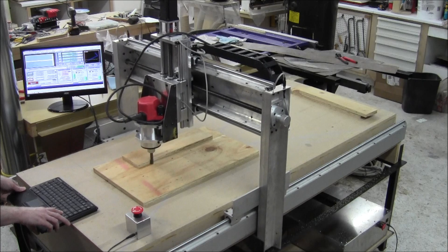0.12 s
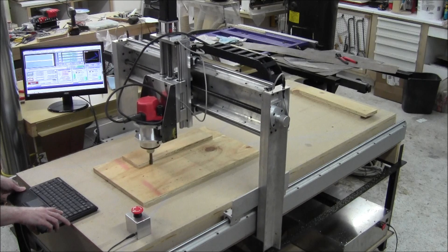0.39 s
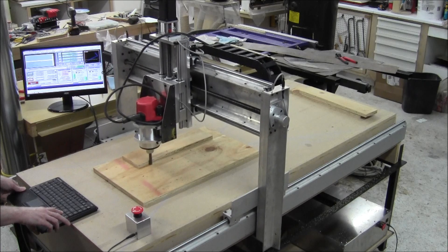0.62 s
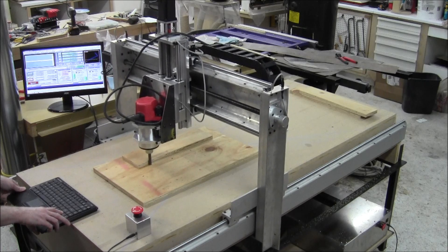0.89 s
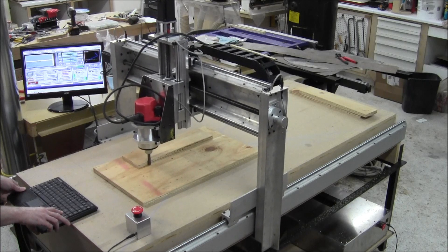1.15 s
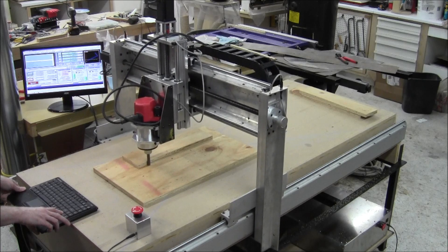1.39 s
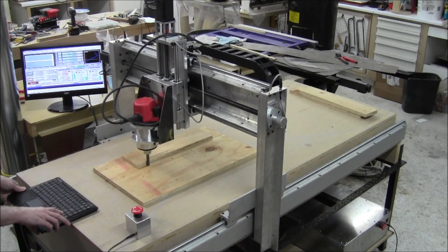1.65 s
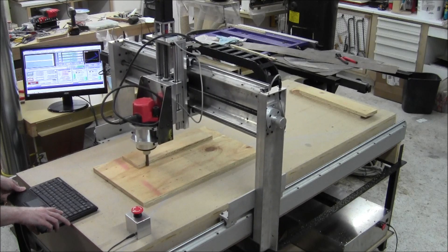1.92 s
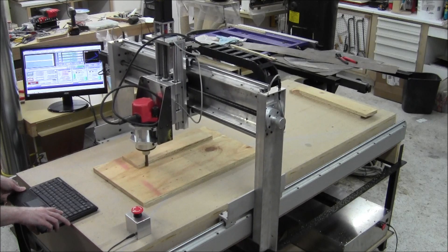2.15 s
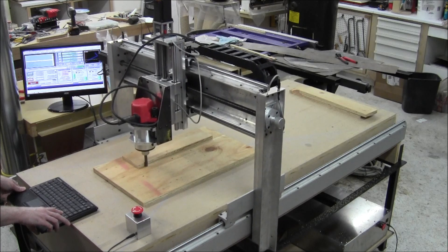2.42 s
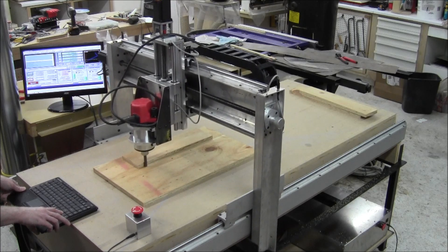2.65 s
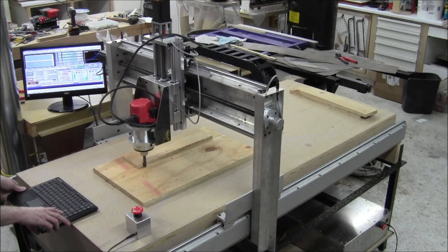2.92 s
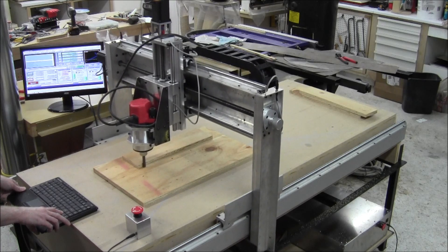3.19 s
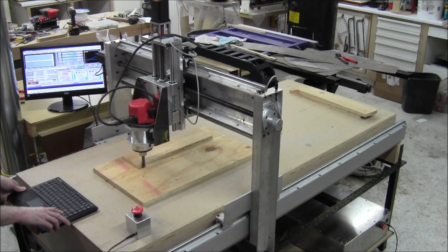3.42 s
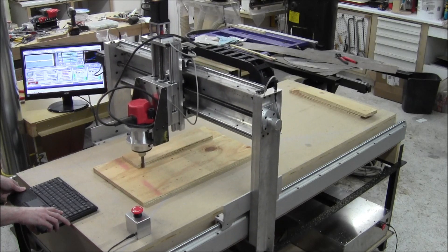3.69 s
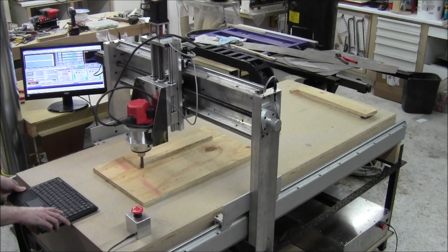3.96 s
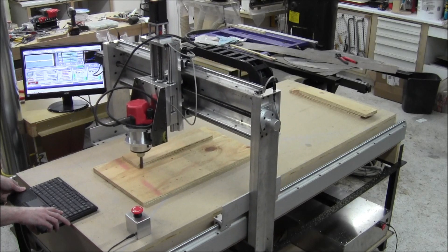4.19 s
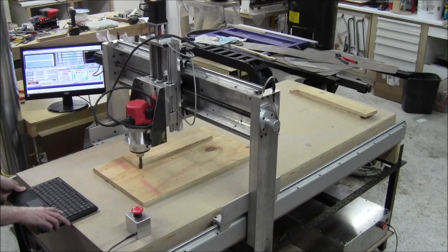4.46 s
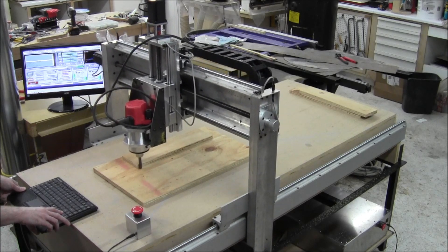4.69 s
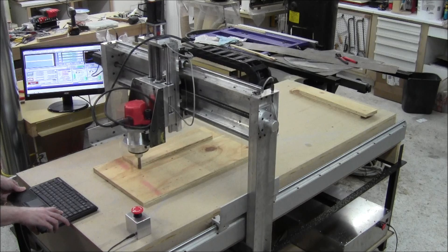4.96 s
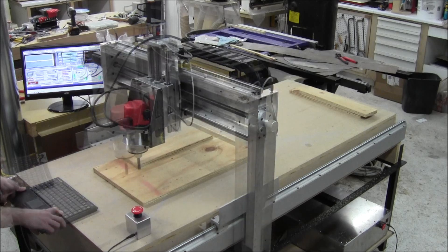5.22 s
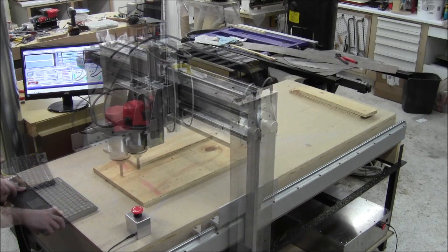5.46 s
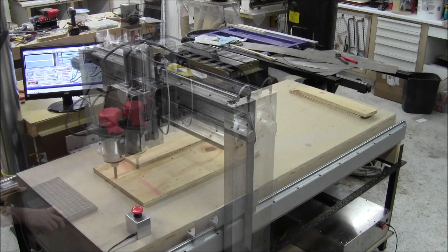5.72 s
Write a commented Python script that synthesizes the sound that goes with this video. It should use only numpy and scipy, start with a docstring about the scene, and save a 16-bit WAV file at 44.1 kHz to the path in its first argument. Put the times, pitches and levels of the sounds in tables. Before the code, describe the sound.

In a workshop, a router spindle on a gantry runs at full speed, cutting a groove in a board. A steady buzzing whine of stacked pitches sits within dense fan roar and chip hiss. Nothing starts or stops; tones only waver slightly. After about four and a half seconds it all fades, the whine edging up in pitch at the very end. Stereo microphones a few steps away, faint room echo.

```python
"""A workshop: a wood router on a gantry cuts a groove along a board at full speed, fading down at the end.
The spindle whines as sines on multiples of its turning rate. The cooling fan and the chips roar as
coloured noise, with a mono feed to the shop's echo. Near the end the whine rises slightly in pitch, its
weak multiples fade and its strong ones change in level. Low hum tones lie underneath, the lowest one
throbbing; they sink by the end."""
import sys
import numpy as np
from scipy import signal
from scipy.fft import rfft, irfft, next_fast_len
from scipy.io import wavfile
from scipy.ndimage import map_coordinates

SR = 44100
rng = np.random.default_rng(int(sys.argv[2]) if len(sys.argv) > 2 else 0)


def bounce(signal):
    """Save signal as a 16-bit WAV file at the path given by the first command-line argument."""
    frames = np.transpose(np.atleast_2d(signal))
    limited = np.clip(frames, -1, 1)
    pcm = np.round(limited * 32767).astype(np.int16)
    wavfile.write(sys.argv[1], SR, pcm)


def volts(x):
    """Linear amplitude factor 10**(x/20) for a level x in dB, scalar or array-like."""
    e = np.asarray(x, float) / 20
    return 10 ** e


N = 257970
TIME = np.arange(N) / SR

# Strong spindle orders, multiples of the turning rate: order
STRONG_ORDERS = [1, 2, 3, 4, 5, 6, 7, 8, 23]
# Amplitude share of the weak orders, dropping near the end: time_s, share_0_to_1
WEAK_SHARE = [(0, 1), (5.52, 0.99), (5.63, 0.2), (5.85, .08)]
# Spots along the board where an order swells or sinks, one list per strong order, then per weak order:
# centre_s, half_length_s, change_db
ORDER_SPOTS = [
    [(4.1, 0.43, 0.6)],
    [(.3, 0.85, -2.5), (1.2, 0.89, 2.5), (2.8, 0.32, 3.5), (3.7, 0.32, 1.5)],
    [(.78, 0.1, 5), (.99, .07, -5), (1.22, 0.14, 4.5), (1.9, 0.14, 2.5), (2.5, 0.2, 5), (3, 0.16, 5.5),
     (3.4, 0.15, 6), (5.3, 0.2, -12), (5.6, .08, 3.5)],
    [(2.9, .4, 3)],
    [(2.4, 0.41, 2), (3.5, 0.2, -2.1), (5.3, 0.75, -15)],
    [(.85, .11, -6), (1.6, .12, 10), (2.2, .3, 6.5), (3, .3, -4)],
    [(.2, 0.53, 5.5), (1.25, 0.12, -4), (2.3, 0.17, -10), (2.75, .15, 4.5), (3.9, 0.33, 4), (4.8, .2, -1.5)],
    [(.3, 1, 9.5), (1.97, 0.23, -15), (2.8, .09, 6), (3.3, .25, -4), (5.1, 0.71, 5.5)],
    [(.2, 0.32, -4.5), (.98, 0.23, 2.5), (2.3, .15, -1), (2.9, 0.27, 3), (3.6, .3, 0.5), (4.8, 0.53, -1)],
    [(.3, .3, 9), (3.4, 1, 8.5), (5.2, .4, 7)],
    [(1.5, .9, 5.5), (4.9, .9, 10)],
    [(1.2, .6, 4), (3.2, .4, 2), (4.8, .7, 6)],
    [(1.5, 1.2, 5.5), (5.5, .2, 7)],
    [(3.6, 2, 8.5)],
    [(.7, .4, 3.5), (2.4, .7, 6.5)],
    [(.4, .5, 4), (3.4, 1.1, 6)],
    [(2.8, 1.5, 3)],
    [(1.5, .3, 4), (4.4, .6, 6)],
    [(.4, .6, 9)],
    [(.3, .3, 4), (2.4, .6, 3)],
    [(.6, .12, 7), (2.8, .3, 7), (5, .09, 15)],
    [(.2, 0.71, 8), (4, .4, 8)],
    [(.4, .4, 8), (1.8, .4, 9.5)],
    [(2, .9, 6), (4, .9, 6)],
    [(3.8, 1.1, 16)],
    [(4, .8, 11)],
    [(2.9, 1.1, 9)],
    [(2.3, .6, 7)],
    [(3, 1.6, 9.5)],
    [(2.1, .6, 9.5), (4.4, .4, 7)],
    [(1.8, .6, 7), (3.5, .8, 12)],
    [(2.6, 0.91, 16)],
]


def unit(x):
    """Scaled to rms 1."""
    return x / np.sqrt(np.mean(x ** 2) + 1e-20)


def along(points, hz):
    """(Hz, value) points interpolated on a log frequency axis."""
    f, v = np.transpose(points)
    return np.interp(np.log(hz + 1), np.log(f + 1), v)


def curves(rows):
    """One value per sample for each column after the time."""
    s, *cols = np.transpose(rows)
    return [np.interp(TIME, s, c) for c in cols]


def wobble(knots_per_s):
    """A smooth random curve through normally distributed knots."""
    knots = rng.standard_normal(400)
    coarse_s = TIME[::64]
    smooth = map_coordinates(knots, [coarse_s * knots_per_s])
    return np.interp(TIME, coarse_s, smooth)


def spot(centre_s, half_length_s, change_db):
    """A bell-shaped swell or dip in dB."""
    return change_db * np.exp(-((TIME - centre_s) / half_length_s) ** 2)


def spots_db(rows):
    """Sum of the swells and dips in rows."""
    return sum(spot(*row) for row in rows)


def filtered(x, response):
    """x through a zero-phase response of frequency."""
    m = next_fast_len(N + SR // 2)
    return irfft(rfft(x, m) * response(np.fft.rfftfreq(m, 1 / SR)), m)[..., :N]


def tone(phase, level_db, side_db, drift_rad=0):
    """A sine whose path to the two microphones differs a little, mostly in arrival time, and drifts."""
    # the sound path shifts as the gantry moves
    phase = phase + rng.uniform(0, 2 * np.pi) + drift_rad * wobble(2.0)
    mid, quadrature = np.sin(phase), np.cos(phase)
    in_phase_part = 0.3 * wobble(2.5) * mid
    delayed_part = (0.9 + 0.3 * wobble(2.5)) * quadrature
    side = volts(side_db) * (in_phase_part + delayed_part)
    return np.sqrt(2) * volts(level_db) * np.array([mid + side, mid - side])


def shaft():
    """Spindle angle in radians: the speed curve plus random hunting, integrated."""
    # creeps up, then rises faster near the end: time_s, speed_rpm
    speed_points = [(0, 24047), (1, 24053), (4.8, 24052), (5, 24068), (5.42, 24075), (5.7, 24186),
                    (5.85, 24201)]
    hunt_rpm = 7
    rpm = curves(speed_points)[0] + hunt_rpm * wobble(3.3)
    return 2 * np.pi * np.cumsum(rpm / 60) / SR


def strong_levels():
    """Strong orders drift with travel, swell or sink at their spots and change as the weak orders fade."""
    # each strong order: start_rms_db (before spots), drift_db_per_s, late_change_db, wander_db
    travel = [(-44.5, 0.76, -1, 0.5), (-36, -1.13, -2.5, 0.5), (-48, 0.3, 6.5, 1.4), (-49, 1.27, -14, 1.1),
              (-41.5, -0.4, 3, 0.8), (-57, 1.57, -8, 1.4), (-46.5, -0.2, -9, 1.8), (-53.5, 0.2, -11, 0.3),
              (-47, -.1, 3.5, .6)]
    # brief common dip of the strong orders above the first: centre_s, half_length_s, change_db
    common_dip = (3.19, 0.096, -2)
    late_share = 1 - curves(WEAK_SHARE)[0]
    levels = []
    for order, row, spots in zip(STRONG_ORDERS, travel, ORDER_SPOTS):
        start_db, drift_db_per_s, late_db, wander_db = row
        level_db = start_db + drift_db_per_s * TIME + late_db * late_share + spots_db(spots)
        if order > 1:
            level_db = level_db + spot(*common_dip)
        levels.append(level_db + wander_db * wobble(5.17))
    return levels


def whine(angle):
    """Unbalance, flutes and commutator each beat a whole number of times per turn."""
    # side share of each strong order, its difference between the microphones: side_db
    strong_side = [-21.5, -17, -19, -24, -17, -14, -11, -14, -17]
    # weak orders, fading near the end: order
    weak_orders = [9, 10, 11, 12, 13, 14, 15, 16, 17, 18, 19, 20, 21, 22, 24, 25, 26, 27, 28, 29, 30, 31,
                   32]
    # each weak order: rms_db (before spots and the late fade), side_db
    weak_levels = [(-59, -15), (-57, -15), (-60, -11), (-59, -10), (-60, -21), (-58, -18), (-63, -12),
                   (-64, -10.5), (-58, -7), (-59, -10.5), (-61, -12), (-71, -12), (-67, -19), (-66, -12),
                   (-66, -13), (-67.5, -15), (-73, -8), (-75, -9), (-75, -2.5), (-78, -6), (-79, -.4),
                   (-79, -2.5), (-81, -.4)]

    def flutter_db(order):
        return 0.14 * np.sqrt(order) * wobble(14)

    strong = 0
    for order, level_db, side_db in zip(STRONG_ORDERS, strong_levels(), strong_side):
        level_db = level_db + flutter_db(order)
        strong = strong + tone(order * angle, level_db, side_db, drift_rad=0.28 * np.sqrt(order))

    weak = 0
    weak_spots = ORDER_SPOTS[len(STRONG_ORDERS):]
    for order, (rms_db, side_db), spots in zip(weak_orders, weak_levels, weak_spots):
        level_db = rms_db + spots_db(spots) + 0.85 * wobble(3.2) + flutter_db(order)
        weak = weak + tone(order * angle, level_db, side_db, drift_rad=1.0)
    return strong + curves(WEAK_SHARE)[0] * weak


def rush(gain, gate):
    """Stereo noise of rms 1, gated and then coloured; mid and side shares set the left-right likeness."""
    # left-right likeness of the roar: freq_hz, correlation_0_to_1
    likeness = [(30, .87), (100, 1), (200, 1), (400, 0.98), (700, 1), (1300, 0.97), (1900, 0.89),
                (2500, 0.91), (5000, 0.87), (9000, 0.85), (11000, 0.84), (13000, 0)]

    def response(hz):
        turn = np.arccos(np.clip(along(likeness, hz), 0, 1)) / 2
        return gain(hz) * [np.cos(turn), np.sin(turn)]

    mid, side = filtered(gate * rng.standard_normal((2, N)), response)
    return unit(np.array([mid + side, mid - side]))


def roar(angle):
    """Fan air rings in the housing; the hiss puffs with each flute; both rise at the end against the fade."""
    # air column of the motor housing: centre_hz, width_hz, relative_db
    housing_modes = [(451, 15.5, -10), (688, 98, -7), (777, 45, -3), (577, 36, -9.5), (906, 34, -2),
                     (1004, 106, 0.5), (1055, 49, -3), (1115, 82, 1), (1328, 94, -2.5), (1464, 45, -16)]
    # fan and chip hiss, spectral density: freq_hz, relative_db
    hiss_spectrum = [(30, -40), (60, -26), (150, -30.5), (300, -19.5), (420, -6.5), (1500, -2),
                     (2000, -3.5), (2700, -2), (3600, 0), (4300, -3), (5000, -6.5), (5700, -5),
                     (8000, -5.5), (10000, -7), (11500, -17), (13000, -20.5), (13700, -22), (14500, -34)]
    # peaks and dips lent by frame, gantry and table: centre_hz, width_hz, change_db
    frame_modes = [(480, 20, 3), (590, 25, -4), (775, 20, -5), (860, 20, -3), (1070, 25, -5),
                   (1225, 40, -4), (1390, 30, -3), (1550, 80, 2), (1760, 120, 2), (1850, 50, -3),
                   (2300, 70, 3), (2660, 110, 3), (2920, 80, -1.5), (3870, 80, -3.5), (4250, 100, 2),
                   (4720, 90, 3.5), (5100, 60, 4), (5240, 90, -3), (5520, 80, 4.5), (6800, 120, -2),
                   (7130, 100, 2), (7410, 70, 3.5), (7580, 80, 1.5), (8400, 100, -1.5), (9100, 150, 2),
                   (9600, 150, 1.5)]
    # slight swells and dips of the roar, rising at the end against the fade: time_s, change_db
    surge_points = [(0, -0.15), (2.4, -0.16), (2.8, 0.6), (3.1, 0.1), (3.8, 0.6), (4.3, 0.06), (5.4, 0.1),
                    (5.85, 1.5)]
    housing_start_db, housing_drift_db_per_s, hiss_base_db = -40, -0.22, -34.5  # before surge and fade

    def frame_gain(hz):
        return volts(sum(db / (1 + (2 * (hz - c) / w) ** 2) for c, w, db in frame_modes))

    def housing_gain(hz):
        power = sum(volts(db) ** 2 / (1 + (2 * (hz - c) / w) ** 4) for c, w, db in housing_modes)
        return np.sqrt(power) * frame_gain(hz)

    def hiss_gain(hz):
        return volts(along(hiss_spectrum, hz)) * frame_gain(hz)

    surge_db = curves(surge_points)[0]
    swell = wobble(3.37)  # shared by housing and hiss
    housing_db = housing_start_db + housing_drift_db_per_s * TIME + surge_db
    housing_db = housing_db + 0.29 * swell + 0.67 * wobble(8)
    housing = volts(housing_db) * rush(housing_gain, 1)

    puffs = 1 + 0.02 * np.cos(angle) + 0.09 * np.cos(2 * angle)  # once and twice per turn
    hiss_db = hiss_base_db + surge_db + 0.41 * swell + 0.091 * wobble(10.0)
    hiss = volts(hiss_db) * rush(hiss_gain, puffs)
    return housing + hiss


def shop(x):
    """Walls and benches answer: a noise tail in which each frequency dies at its own speed."""
    # workshop echo: freq_hz, t60_s
    decay_times = [(200, .5), (2000, .4), (10000, .2)]
    hz, t, spectrum = signal.stft(rng.standard_normal((2, SR // 2)), SR, nperseg=256)
    decay = volts(-60 * t / along(decay_times, hz)[:, None])
    tail = signal.istft(spectrum * decay, SR, nperseg=256)[1]
    return signal.fftconvolve(x, tail / np.linalg.norm(tail[0]), axes=1)[:, :N]


def throb():
    """Level of the lowest hum in dB: it sinks steadily and dips twice each period."""
    # spots where it swells or sinks: centre_s, half_length_s, change_db
    hum_spots = [(1.3, .25, 2.5), (3.18, .05, -6), (3.84, .12, 4.5)]
    start_db, drift_db_per_s = -58, -1.03  # before dips and spots
    period_s, offset_s, dip_half_width = 0.503, 0.39, 0.16  # half-width as a share of the period
    main_dip_db, second_dip_db_per_s = -6.5, -0.9  # the second dip deepens with time

    def dip(lead):
        cycle = ((TIME - offset_s) / period_s + lead) % 1
        return np.exp(-((cycle - 0.5) / dip_half_width) ** 2)

    dips_db = main_dip_db * dip(0.41) + second_dip_db_per_s * TIME * dip(0)
    return start_db + drift_db_per_s * TIME + dips_db + spots_db(hum_spots) + 0.7 * wobble(6)


def hum():
    """Low tones of steady pitch whose levels waver, nearly the same at both microphones."""
    # upper hum tones: pitch_hz, rms_db (before the level curve), waver_db
    hum_tones = [(120, -76, 2.5), (200.2, -73, 2), (240, -70, 1.5), (280.7, -73, 2), (318, -74, 3)]
    # level change of those tones: time_s, change_db
    level_points = [(0, -2), (1.5, -1.5), (3, -1.5), (4.5, -1.5), (5.2, -6), (5.85, -12)]
    lowest_hz = 100.1
    level_db = curves(level_points)[0]
    total = tone(2 * np.pi * lowest_hz * TIME, throb(), side_db=-23)
    for hz, rms_db, waver_db in hum_tones:
        tone_db = rms_db + level_db + waver_db * wobble(3.08)
        total = total + tone(2 * np.pi * hz * TIME, tone_db, side_db=-16)
    return total


def scene():
    """The router, its roar echoed by the shop, fades over the hum."""
    # fade of router and echo: time_s, level_db
    fade_points = [(0, 0), (4.3, 0.5), (4.6, -0.5), (4.9, -2), (5.2, -3), (5.5, -6.5), (5.85, -10)]
    angle = shaft()
    air = roar(angle)
    echo = volts(-19) * shop(air.mean(axis=0, keepdims=True))
    router = whine(angle) + air + echo
    return volts(curves(fade_points)[0]) * router + hum()


def roll_off(x):
    """The treble ends steeply here."""
    return signal.sosfilt(signal.butter(12, 14490, fs=SR, output="sos"), x)


def record(dry):
    """Two microphones whose level balance leans differently with frequency."""
    # freq_hz, left_minus_right_db
    balance = [(60, -0.5), (180, 0.0), (530, 1.0), (1570, 0), (4680, 1), (13900, -2.5)]
    halves = np.array([[1], [-1]]) / 2
    mix = filtered(dry, lambda hz: volts(along(balance, hz) * halves))
    return roll_off(mix)


dry = scene()
out = record(dry)
bounce(out)
```